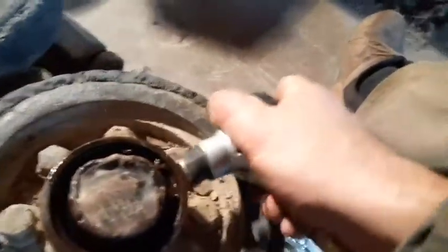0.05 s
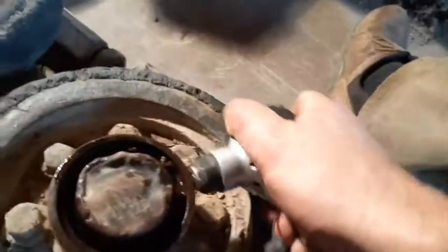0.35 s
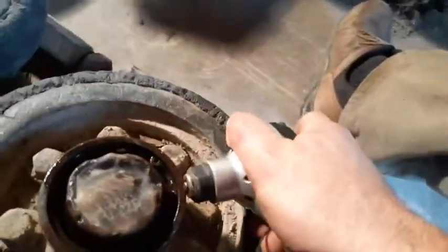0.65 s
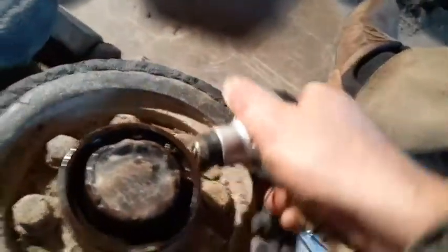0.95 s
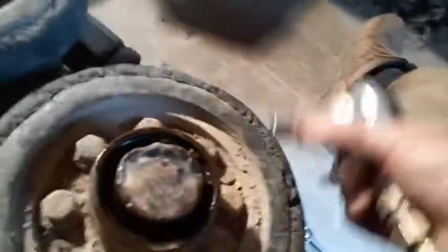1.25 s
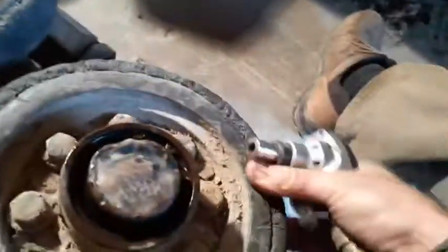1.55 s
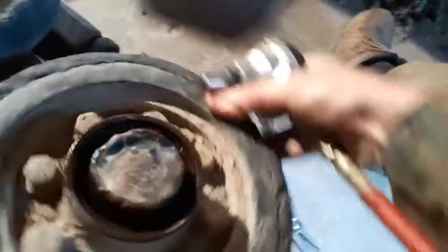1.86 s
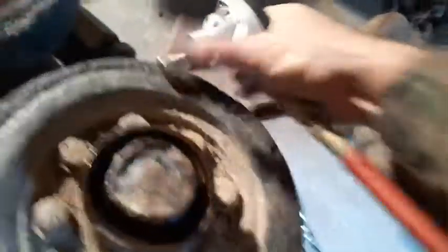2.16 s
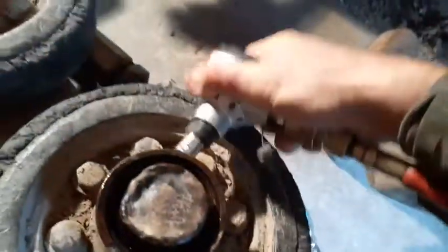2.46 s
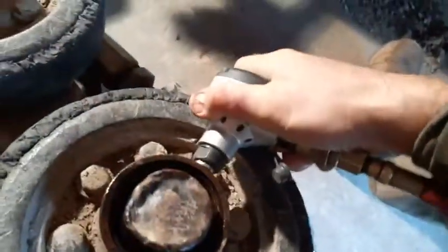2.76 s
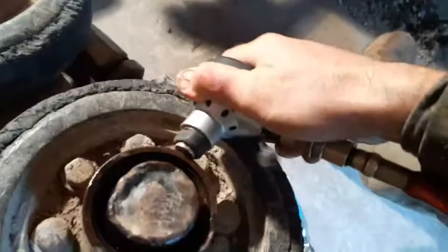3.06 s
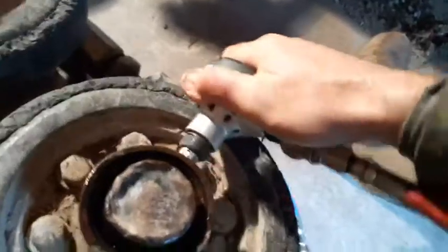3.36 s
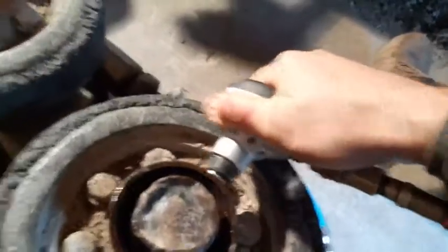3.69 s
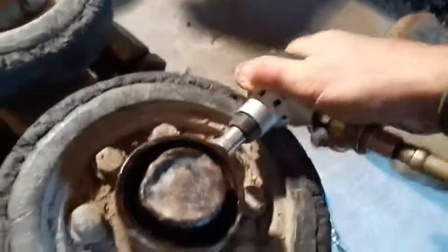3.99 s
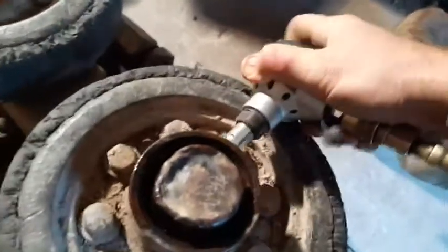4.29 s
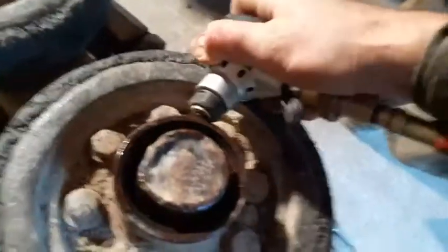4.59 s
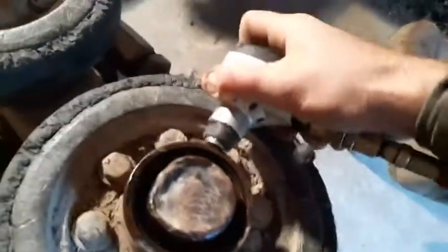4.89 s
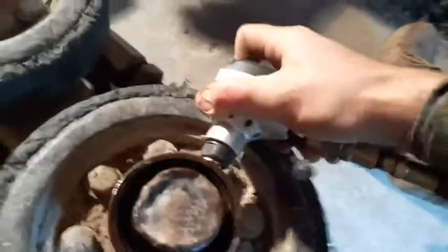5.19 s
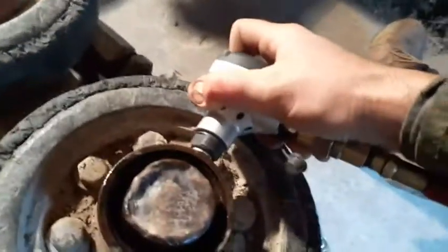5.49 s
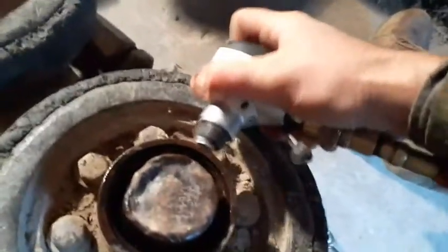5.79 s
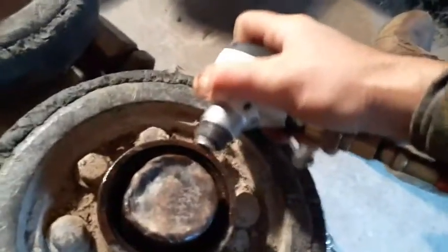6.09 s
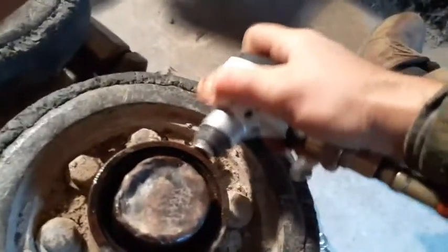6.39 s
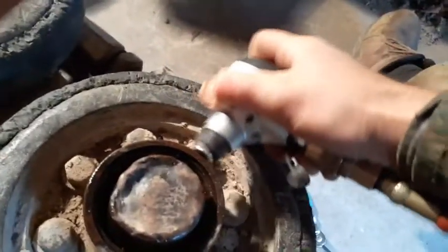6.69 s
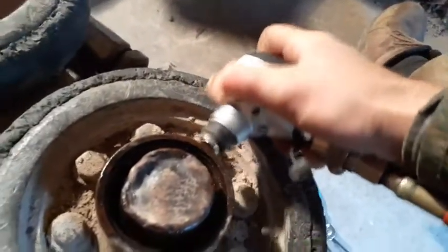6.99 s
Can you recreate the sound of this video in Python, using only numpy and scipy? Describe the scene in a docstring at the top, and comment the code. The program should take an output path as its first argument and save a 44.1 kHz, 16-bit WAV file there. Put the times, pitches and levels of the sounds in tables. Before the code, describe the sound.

A handheld air hammer rattles briefly against a steel wheel hub, each blow a hard pop with a puff of exhaust. After a lull with a small scrape and a knock, leaking air swells into a high, whistling hiss. Single blows and metal clicks break through it, then the tool catches and pounds rapidly to the end. It is heard up close in a small workshop with a faint electrical hum.

```python
"""Air palm nailer on a wheel hub

A piston pounds the rim of a hub in a small workshop: single blows, short bursts, then a run of 22 to 32
blows a second. Each stroke is a valve spit, a hard pop that sets the wheel ringing, and a turbulent
blast of exhaust. Between strokes the valve leaks with a high hiss and the nose of the tool clicks on
the steel. A mains hum lies underneath."""
import sys
import numpy as np
from scipy import signal
from scipy.fft import rfft, irfft, next_fast_len
from scipy.io import wavfile
from scipy.ndimage import uniform_filter1d, map_coordinates

SR = 44100
rng = np.random.default_rng(int(sys.argv[2]) if len(sys.argv) > 2 else 0)


def digitize_waveform(pressure):
    """Quantize a signal to 16-bit integers and store it at the path in sys.argv[1].

    Rows of a 2-D input are taken as channels; values are limited to [-1, 1].
    """
    field = np.atleast_2d(pressure).T
    bounded = np.clip(field, -1, 1)
    quanta = np.round(bounded * 32767).astype(np.int16)
    wavfile.write(sys.argv[1], SR, quanta)


N = 319725
TIME_S = np.arange(N) / SR
ANTIPHASE = np.array([[1], [-1]])


def amp(db):
    """Decibels as an amplitude ratio."""
    return 10 ** (np.asarray(db) / 20)


def unit(x):
    """Normalisation to an rms of 1."""
    return x / np.sqrt(np.mean(x ** 2) + 1e-20)


def along(points, hz):
    """Interpolation of (frequency_hz, value) points on a logarithmic frequency axis."""
    knots_hz, values = np.transpose(points)
    return np.interp(np.log(hz + 1), np.log(knots_hz + 1), values)


def curve(points, at_s=TIME_S):
    """Linear interpolation of (time_s, value) points."""
    return np.interp(at_s, *np.transpose(points))


def wobble(rate_hz, step=16):
    """Smooth random modulation: a spline through rate_hz Gaussian knots a second."""
    coarse = np.arange(0, N + step, step)
    knots = rng.standard_normal(int(N * rate_hz / SR) + 4)
    return np.interp(np.arange(N), coarse, map_coordinates(knots, [coarse * rate_hz / SR]))


def filtered(x, response):
    """Zero-phase filtering: the spectrum is multiplied by a frequency response."""
    size = next_fast_len(N + SR // 2)
    return irfft(rfft(x, size) * response(np.fft.rfftfreq(size, 1 / SR)), size)[..., :N]


def pan(db):
    """Channel gains for a level difference, left minus right."""
    return amp([[db / 2], [-db / 2]])


def noise(spectrum):
    """Spectrally shaped noise of rms 1, uncorrelated between the channels."""
    return unit(filtered(rng.standard_normal((2, N)), lambda hz: amp(along(spectrum, hz))))


def add(track, start_s, sound):
    """Superposition of a sound on a track."""
    start = max(round(start_s * SR), 0)
    part = track[..., start:start + sound.shape[-1]]
    part += sound[..., :part.shape[-1]]


def fade(t, attack_s, t60_s):
    """Exponential rise and decay from t = 0."""
    t = np.maximum(t, 0)
    return (1 - np.exp(-t / attack_s)) * amp(-60 * t / t60_s)


def ring(t, hz, attack_s, t60_s):
    """Free vibration of one damped mode."""
    return np.sin(2 * np.pi * hz * t) * fade(t, attack_s, t60_s)


# Course of the hum: time_s, level_db
HUM_LEVEL = [(0.65, -70), (1.69, -65), (2.41, -53), (2.77, -51.5), (2.91, -54), (3.18, -61), (5.5, -60)]
# Harmonics of the hum: pitch_hz, relative_db
HUM_HARMONICS = [(120, 1.5), (240, -11), (360, -28.5)]
# Spectrum of the room's rush: frequency_hz, density_db
AMBIENT_SPECTRUM = [(25, -32), (70, 1.5), (130, -5), (280, -1.5), (500, -15.5), (1000, -15), (3000, -20),
                    (8000, -22.5), (15500, -25.5)]


def mains_hum(rush_db=-60, rush_swell=0.86):
    """A harmonic series wavers in phase and level, over a low rush of the room that swells with it."""
    hum_db = curve(HUM_LEVEL)
    hum = unit(sum(amp(db) * np.sin(2 * np.pi * hz * TIME_S + .2 * wobble(5))
                   for hz, db in HUM_HARMONICS))
    mid, side = noise(AMBIENT_SPECTRUM)
    rush = mid + 0.51 * side * ANTIPHASE
    swell_db = rush_swell * (hum_db - hum_db.mean())
    return amp(hum_db + 1 + wobble(14)) * hum + amp(rush_db + swell_db) * rush


# Reverberation time of the workshop: frequency_hz, t60_s
REVERB_TIMES = [(80, 0.091), (300, 0.23), (1000, 0.22), (3000, 0.2), (7000, 0.29), (15000, 0.16)]


def reverberation(x, steps=12, onset_s=0.0057):
    """Diffuse reflections decay exponentially; their pattern drifts as hand and listener move."""
    out = np.zeros((2, N))
    hop = N // steps + 1
    for k in range(steps + 1):
        hz, t, spectra = signal.stft(rng.standard_normal((2, SR // 2)), SR, nperseg=256)
        decay = amp(-60 * t / along(REVERB_TIMES, hz)[:, None])
        tail = signal.istft(spectra * decay, SR, nperseg=256)[1]
        tail *= 1 - np.exp(-(np.arange(tail.shape[1]) / SR / onset_s) ** 2)
        tail /= np.linalg.norm(tail[0])
        start = max((k - 1) * hop, 0)
        n = np.arange(start, min((k + 1) * hop, N))
        crossfade = 1 - abs(n / hop - k)
        add(out, start / SR, signal.fftconvolve(x[:, n] * crossfade, tail, axes=1))
    return out


# Echoes from floor and walls: delay_s, gain_db, left_minus_right_db
REFLECTIONS = [(0.0123, -16, -3), (.0375, -22.5, 5), (0.046, -25.5, 2)]


def early_reflections(x):
    """Specular reflection: each near surface returns a delayed, weaker copy."""
    out = np.zeros((2, N))
    for delay_s, db, side_db in REFLECTIONS:
        add(out, delay_s, amp(db) * pan(side_db) * x.mean(axis=0))
    return out


# Spectrum of rubbing cloth: frequency_hz, density_db
CLOTH_SPECTRUM = [(150, -9), (600, 0), (1500, -8), (3000, -18.5), (12000, -20)]


def sleeve():
    """Friction noise: a sleeve brushes softly as the arm draws back."""
    level_db = curve([(.85, -92), (.92, -63.5), (.98, -61.5), (1.05, -90), (1.1, -120)])
    return amp(level_db + 2 * wobble(75)) * noise(CLOTH_SPECTRUM)


# Pitch of the whistle, shifting as the tool tilts: time_s, pitch_hz
WHISTLE_PITCH = [(2.3, 11500), (2.8, 11250), (3.4, 11350), (3.8, 11100), (4.2, 11500), (4.7, 11550),
                 (5.5, 11450)]


def whistle(half_width_hz=600, drift_hz=90):
    """A fuzzy flow tone: narrow-band noise centred on a wandering pitch near 11 kHz."""
    bands = unit(filtered(rng.standard_normal((2, 2, N)), lambda hz: 1 / (1 + (hz / half_width_hz) ** 3)))
    phase = 2 * np.pi * np.cumsum(curve(WHISTLE_PITCH) + drift_hz * wobble(18)) / SR
    return bands[0] * np.cos(phase) + bands[1] * np.sin(phase)


# Strength of the edge tone against the hiss: time_s, relative_db
EDGE_LEVEL = [(4.3, -25), (4.6, -2), (5.5, -12.5)]


def edge_tone(pitch_hz=12000, half_width_hz=170):
    """A jet oscillating at an edge gives a keen, narrow resonance peak."""
    white = rng.standard_normal((2, N))
    tone = unit(filtered(white, lambda hz: 1 / (1 + ((hz - pitch_hz) / half_width_hz) ** 2)))
    return amp(curve(EDGE_LEVEL)) * tone


def shifting_colour(x, depth_db):
    """Spectral modulation: frequency bands swell and fade independently, at random."""
    spectra = signal.stft(x, nperseg=512)[2]
    field = rng.standard_normal(spectra.shape[1:])
    field = uniform_filter1d(field, size=5, axis=0)  # across frequency
    field = uniform_filter1d(field, size=70, axis=1)  # across time
    gain = amp(depth_db * unit(field))
    return signal.istft(spectra * unit(gain), nperseg=512)[1][:, :N]


# Hiss of the flow through the valve: time_s, level_db
HISS_LEVEL = [(.8, -70), (1.25, -59), (1.58, -63), (1.85, -55), (2.1, -54), (2.125, -46), (2.23, -46.5),
              (2.255, -33), (2.46, -18.5), (2.88, -17.5), (2.91, -33.5), (3.4, -34.5), (3.46, -40.5),
              (3.98, -40.5), (4.28, -34), (4.95, -32.5), (5.2, -28), (5.55, -30.5)]
# Spectrum of the broad rush: frequency_hz, density_db
RUSH_SPECTRUM = [(200, -28.5), (1000, -24.5), (1600, -19), (2050, -22), (2500, -16), (3100, -25),
                 (3950, -16), (4750, -22.5), (6000, -10), (7900, -21.5), (9700, -10.5), (12500, -1.5),
                 (14000, -10), (15300, -5)]
# Fizz of the finest jets against the hiss: time_s, relative_db
FIZZ_LEVEL = [(2.4, -17), (2.85, -32), (3.2, -13), (3.7, -11.5), (4.3, -20), (4.8, -15), (5.1, -8),
              (5.55, -6)]
# Spectrum of the fizz: frequency_hz, density_db
FIZZ_SPECTRUM = [(10000, -53.5), (13000, -13.5), (14000, -1.5), (14600, -6.5), (15200, -2.5), (16000, -9)]


def valve_leak(running_db=-6):
    """Jet noise: air flutters past the barely open valve as a rush, a fizz and two flow tones."""
    running = TIME_S > LONG_RUN_RATE[0][0]  # the running piston takes the air
    hiss_db = curve(HISS_LEVEL) + running_db * running
    whistle_db = np.interp(hiss_db, [-56, -45], [-10, .5])  # a feeble flow hardly whistles
    tones = amp(whistle_db) * whistle() + edge_tone()
    flutter_db = 0.93 * wobble(25) + .6 * wobble(130)
    rush = amp(-7) * noise(RUSH_SPECTRUM)
    fizz = amp(curve(FIZZ_LEVEL)) * noise(FIZZ_SPECTRUM)
    jet = shifting_colour(rush + fizz, depth_db=2.5)
    return amp(hiss_db + flutter_db) * (tones + jet) * pan(db=4)


# Spectrum of the closing valve's spit: frequency_hz, density_db
CLOSING_SPECTRUM = [(1000, -22), (3000, -14), (5000, -7), (8000, -18), (10500, -3), (13000, -8),
                    (15500, 3.5)]


def valve_closing(start_s=1.1005, level_db=-6.5):
    """A flow transient: the valve snaps shut with one spit of air as the tool lifts off."""
    burst = fade(TIME_S - start_s, attack_s=.0003, t60_s=.012)
    return amp(level_db) * burst * noise(CLOSING_SPECTRUM) * pan(db=2.5)


# Spectrum shared by scrape, nose clicks and stroke spits: frequency_hz, density_db
CLICK_SPECTRUM = [(200, -8), (1300, 0), (2800, -8.5), (5000, -0.5), (8000, -4), (11000, 3), (15500, -11.5)]


def nose_scrape(start_s=1.055, end_s=1.1, final_db=-50, rise_db=15):
    """Sliding friction: rust grates in gritty ticks as the nose slips off the hub."""
    progress = (TIME_S - start_s) / (end_s - start_s)
    sliding = (progress > 0) & (progress < 1)
    grit_db = 4 * wobble(250)
    level_db = final_db - rise_db * (1 - np.clip(progress, 0, 1)) + grit_db
    return sliding * amp(level_db) * noise(CLICK_SPECTRUM) * pan(db=4.5)


# Contacts of nose and hub: start_s, level_db, pitch_hz, click_relative_db
CONTACTS = [(1.0996, -30, 1300, 9), (1.322, -20, 885, -7.5), (2.444, -20, 1130, 0.5), (2.626, -23, 280, 1),
            (2.728, -20, 790, -24), (3.43, -22.5, 1110, 8.5), (3.624, -31.5, 1400, -7),
            (3.678, -30, 830, -24), (3.871, -32, 1377, 1), (4.168, -30.5, 1070, -9),
            (4.188, -33, 1134, -0.5), (4.406, -30.5, 1240, 9), (4.421, -20, 1086, 8.5),
            (4.4414, -14, 1060, 6), (4.793, -28.5, 810, -29)]
# Modes of the nose: frequency_ratio, relative_db
NOSE_MODES = [(.8, -15.5), (1, 2), (1.2, -7), (1.5, -11.5), (1.85, -11)]


def nose_contacts():
    """Impact of steel on rusty steel: heavily damped modes knock, and a noise burst clicks."""
    knocks, clicks = np.zeros((2, N)), np.zeros(N)
    t = np.arange(SR // 10) / SR
    snap = fade(t, attack_s=.0005, t60_s=.016)
    for start_s, db, pitch_hz, click_db in CONTACTS:
        for ratio, mode_db in NOSE_MODES:
            mode_hz = ratio * pitch_hz * np.exp(0.055 * rng.standard_normal())
            mode = ring(t, mode_hz, attack_s=0.0011, t60_s=.026)
            add(knocks, start_s, amp(db + mode_db - 6.5) * mode)
        add(clicks, start_s, amp(db + click_db + 1) * snap)
    return (knocks + clicks * noise(CLICK_SPECTRUM)) * pan(db=4.5)


def air_puffs(strokes):
    """Near-field flow: expelled air pushes the two channels in antiphase, making a low thump."""
    out, t = np.zeros(N), np.arange(SR // 8) / SR
    for start_s, _, air_db in strokes:
        scatter_db, detune = rng.standard_normal(2)
        thump = ring(t, hz=72 * np.exp(.1 * detune), attack_s=0.0064, t60_s=.07)
        add(out, start_s, -amp(air_db + 7.5 + scatter_db) * thump)
    return out * ANTIPHASE


def glancing_paths(jet, starts_s, gain=0.4, paths=3):
    """Comb filtering: the jet glances off hand, hub and rim by paths that change as the tool jumps."""
    n, out = np.arange(N), jet.copy()
    stroke = np.searchsorted(starts_s, TIME_S)
    delays_s = rng.uniform(.0003, .0022, (len(starts_s) + 1, 2, paths))
    for channel in range(2):
        for path in range(paths):
            lag = (delays_s[stroke, channel, path] * SR).astype(int)
            out[channel] += gain * jet[channel, np.maximum(n - lag, 0)]
    return out / np.sqrt(1 + paths * gain ** 2)


# Spectrum of the exhaust jet: frequency_hz, density_db
EXHAUST_SPECTRUM = [(30, -18), (70, -7.5), (150, 1.5), (400, 0), (900, -.5), (1500, -2.5), (2600, -3),
                    (4300, -7.5), (5800, -8), (6800, -4.5), (8500, -10.5), (11000, -6.5), (13000, -4),
                    (15500, -7.5)]


def exhaust(strokes, spit_lead_s=.0022):
    """Turbulent discharge: the valve spits just before each stroke, then the cylinder dumps its air."""
    blast, spit = np.zeros(N), np.zeros(N)
    t = np.arange(SR // 6) / SR
    opening = fade(t, attack_s=.001, t60_s=.012)
    for start_s, _, air_db in strokes:
        size, length = rng.standard_normal(2)
        outflow = fade(t, attack_s=.0017, t60_s=.062 * np.exp(.15 * length))
        add(blast, start_s, amp(air_db + 11) * outflow)
        add(spit, start_s - spit_lead_s, amp(air_db + 6 + 3 * size) * opening)
    ragged = amp(1.4 * np.array([wobble(700), wobble(700)]))
    jet = glancing_paths(noise(EXHAUST_SPECTRUM), strokes[:, 0])
    return blast * ragged * jet * pan(db=0.5) + spit * noise(CLICK_SPECTRUM) * pan(db=4.5)


# Hold of the tool on the hub, from light (0) to firm (1): time_s, firmness
HOLD = [(.15, 0.3), (.25, 0.15), (5.3, 0), (5.7, 1)]
# Modes of wheel and tyre under each hold: pitch_hz, light_db, firm_db
WHEEL_MODES = [(147, -39, -37), (269.4, -24, -33), (324, -33.5, -40), (707, -36, -36.5), (798.6, -26, -34),
               (883, -29, -42), (949, -26.5, -23), (1050, -35, -36), (1130, -45.5, -29.5)]


def piston_blows(strokes):
    """Impulse excitation: the piston lands with a brief pressure pop, and the wheel's modes ring on."""
    out, t = np.zeros((2, N)), np.arange(SR // 5) / SR
    pop_t = t[:SR // 50]
    mode_hz, light_db, firm_db = np.transpose(WHEEL_MODES)
    modes = ring(t, mode_hz[:, None], attack_s=0.0093, t60_s=.16)
    for start_s, pop_db, _ in strokes:
        firmness = np.clip(curve(HOLD, start_s), 0, 1)
        detune = np.exp(0.051 * rng.standard_normal())
        pop_hz = (880 + 130 * firmness) * detune  # a firm hold tightens the pop
        near = amp(4) * ring(pop_t, pop_hz, attack_s=.0001, t60_s=0.0054)
        far = amp(3) * ring(pop_t - .00018, pop_hz, attack_s=0.000097, t60_s=0.0071)
        add(out, start_s, amp(pop_db) * np.array([near, far]))
        mode_db = light_db + firmness * (firm_db - light_db) + 2 * rng.standard_normal(len(mode_hz))
        add(out, start_s, amp(pop_db + mode_db) @ modes)
    return out


def free_run(rates, surplus_db, surplus_s=0.23, usual_hz=28):
    """Self-sustained oscillation: one blow a cycle, harder when a slow cycle fills the cylinder more."""
    start_s, end_s = rates[0][0], rates[-1][0]
    t = np.arange(round(start_s * SR), round(end_s * SR)) / SR
    cycles = np.cumsum(curve(rates, t)) / SR
    starts_s = np.interp(np.arange(np.ceil(cycles[-1])), cycles, t)
    octaves_slower = np.log2(usual_hz / curve(rates, starts_s))
    # a rested hose holds extra air, which is soon used up
    hose_db = surplus_db * np.exp(-((starts_s - start_s) / surplus_s) ** 2)
    pop_scatter, air_scatter = rng.standard_normal((len(starts_s), 2)).T
    pop_db = -3.5 + 2 * octaves_slower + 1.7 * pop_scatter
    air_db = -18.5 + 2.5 * octaves_slower + hose_db + 0.32 * air_scatter
    return np.column_stack([starts_s, pop_db, air_db])


# Stroke rate in the opening burst: time_s, rate_hz
SHORT_RUN_RATE = [(0.0053, 24.5), (0.093, 34.7904), (0.16, 13.1698)]
# Lone strokes and stutters of two or three: start_s, pop_db, air_db
LONE_STROKES = [(0.2399, -2, -18), (0.3971, -2, -15), (0.4402, -1.5, -15.5), (0.4919, -3.5, -17),
                (2.8954, -5, -17.5), (3.2004, -4, -17), (3.2509, -2.5, -16.5), (3.8963, -2, -17),
                (4.4569, -1, -16), (4.9213, -4, -17.5), (5.2486, -5, -17)]
# Stroke rate in the closing run: time_s, rate_hz
LONG_RUN_RATE = [(5.584, 30.69), (5.752, 27.05), (5.778, 30.46), (5.966, 28.52), (6.05, 31.23),
                 (6.407, 28.74), (6.449, 23.69), (6.635, 30.13), (6.749, 27.42), (6.821, 24.32),
                 (7.144, 22.05), (7.24, 31.86)]


def piston_strokes():
    """The impulse train that drives pops, puffs and exhaust: rows of start_s, pop_db, air_db."""
    short_run = free_run(SHORT_RUN_RATE, surplus_db=0)
    long_run = free_run(LONG_RUN_RATE, surplus_db=2)
    return np.vstack([short_run, LONE_STROKES, long_run])


def scene():
    """Superposition of the direct sound of tool and hub, the workshop's reflections and its hum."""
    strokes = piston_strokes()
    blows, air = piston_blows(strokes), exhaust(strokes)
    nose_and_valve = nose_contacts() + nose_scrape() + valve_leak() + valve_closing()
    into_room = amp(-9.5) * blows + amp(-3.5) * air + amp(-14) * nose_and_valve
    echoes = reverberation(into_room) + early_reflections(blows)
    return blows + air + nose_and_valve + air_puffs(strokes) + echoes + sleeve() + mains_hum()


def record(dry, ceiling=.9, cutoff_hz=15850):
    """Soft saturation rounds the loudest peaks; a steep low-pass filter limits the band."""
    rounded = dry / (1 + np.abs(dry / ceiling) ** 6) ** (1 / 6)
    return filtered(rounded, lambda hz: 1 / np.sqrt(1 + (hz / cutoff_hz) ** 240))


dry = scene()
out = record(dry)
digitize_waveform(out)
```